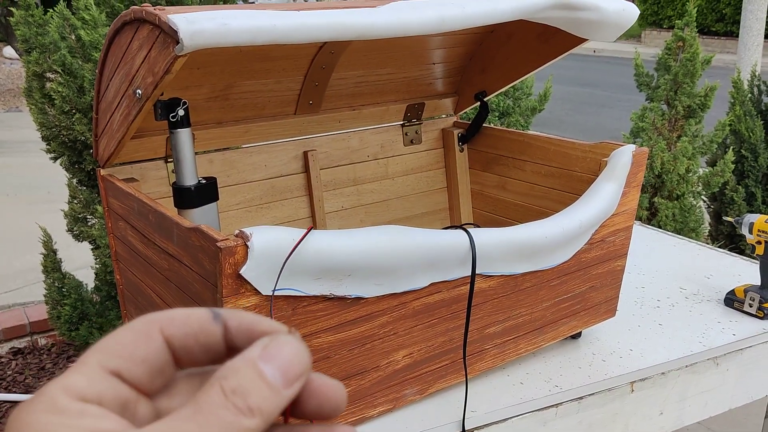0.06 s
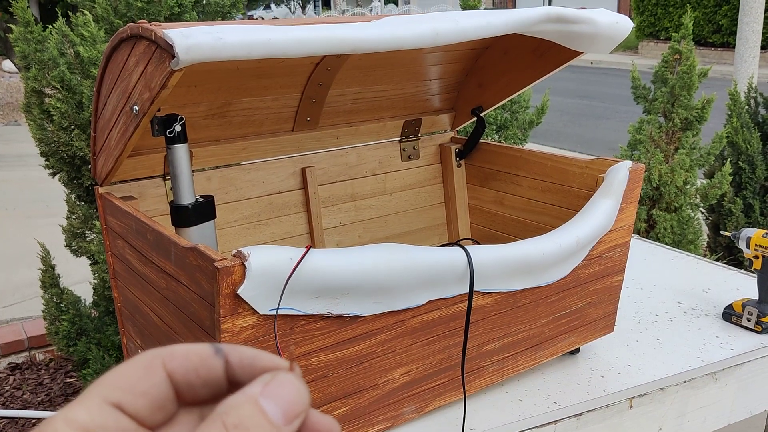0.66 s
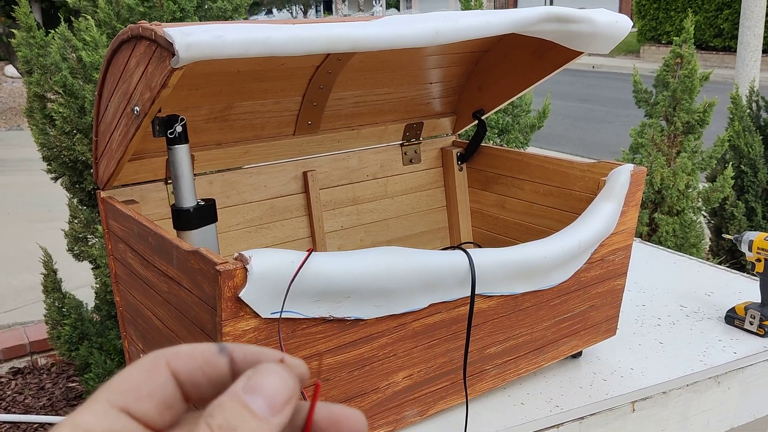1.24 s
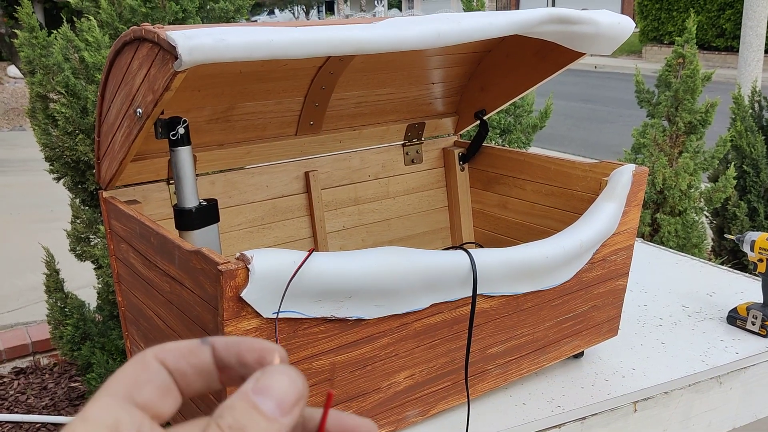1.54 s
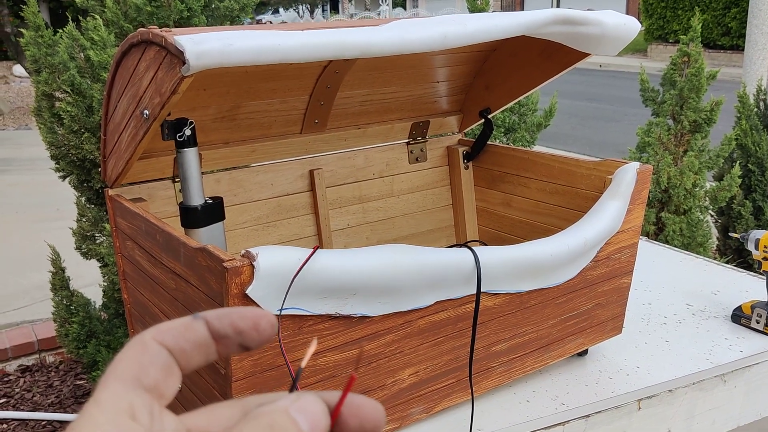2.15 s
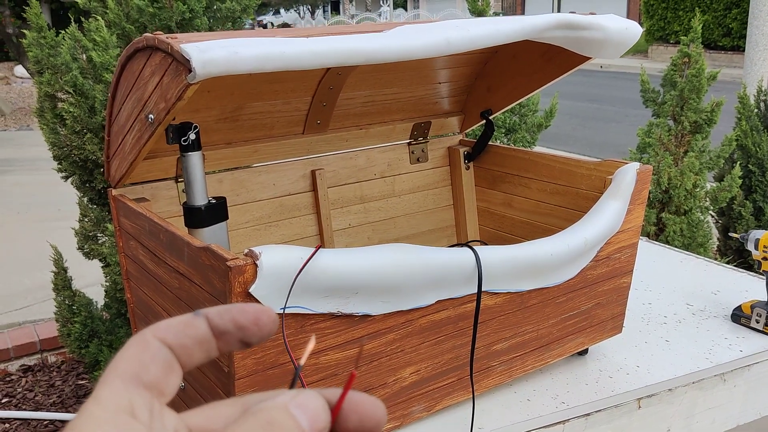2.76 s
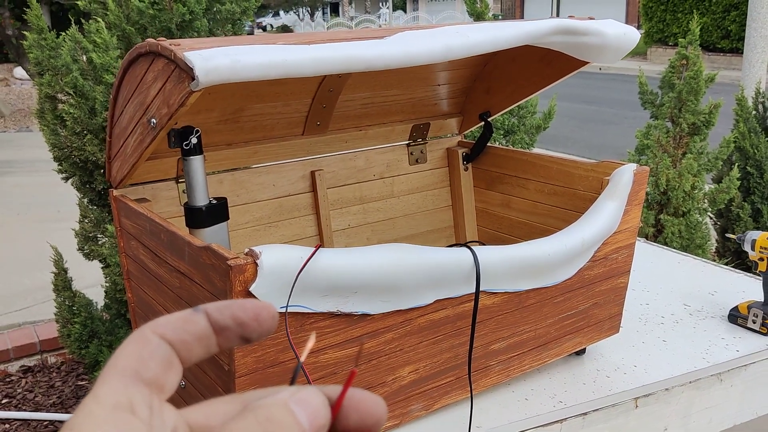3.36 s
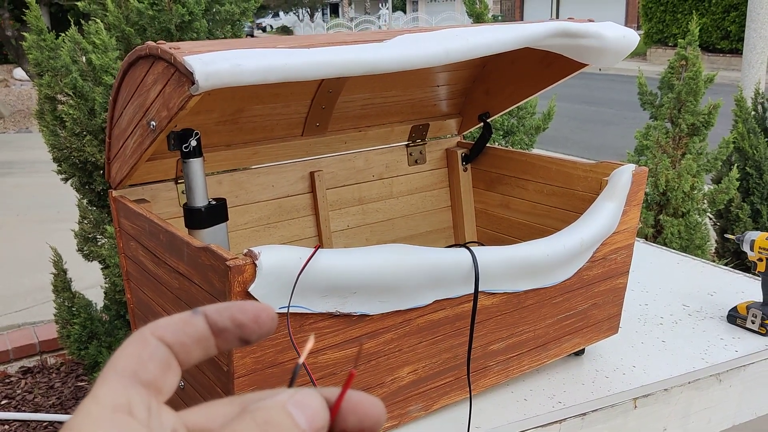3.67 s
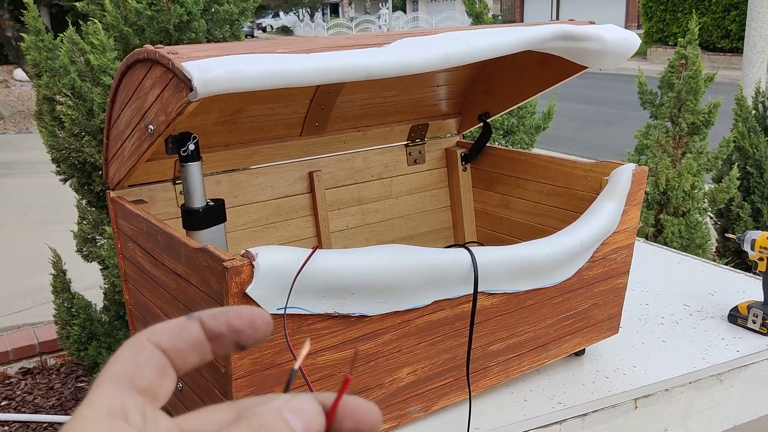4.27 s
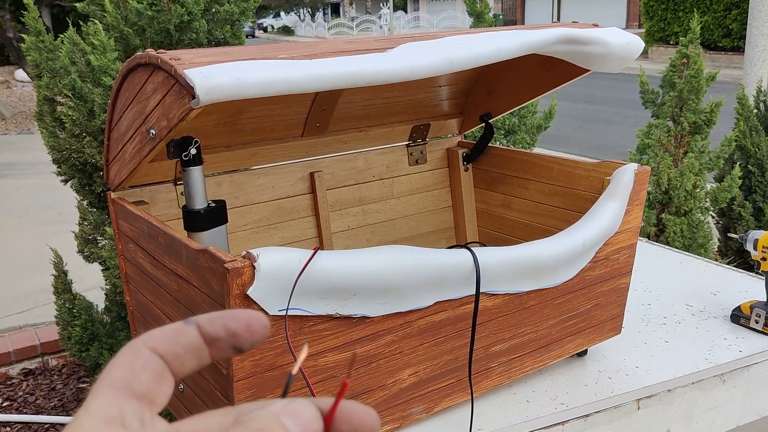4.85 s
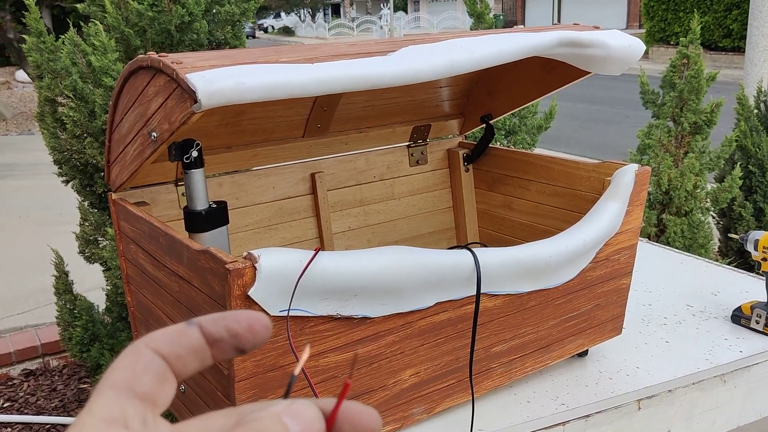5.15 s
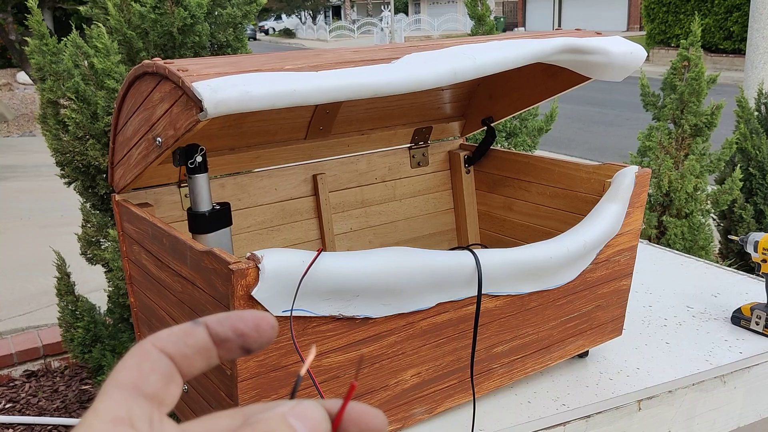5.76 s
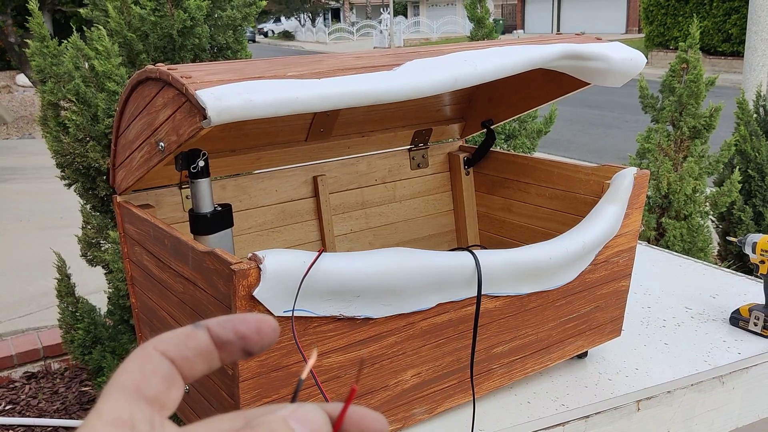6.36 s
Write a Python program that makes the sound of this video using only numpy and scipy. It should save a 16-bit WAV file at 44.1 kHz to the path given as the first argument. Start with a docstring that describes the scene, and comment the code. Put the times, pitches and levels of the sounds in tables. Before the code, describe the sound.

A small electric actuator whines over a low hum as it slowly lowers the lid of a wooden chest, outdoors and an arm's length away. Bare wires scrape briefly, and the whine dips and comes back stronger. The hinge then ticks and binds, making the lid shudder softly as the whine brightens, before the motor runs on. Light wind, distant traffic and a faint electrical buzz lie underneath.

```python
"""A small linear actuator slowly lowers the lid of a wooden chest outdoors, an arm's length away.
From the start its motor whines over a low hum, distant traffic, light wind and a faint electrical buzz.
At 1.3 s the bare supply wires scrape; the whine drops out and spins up again. From 2.3 s the loaded
hinge ticks, then binds and sets the lid shuddering while a far car passes. The whine is pushed
brighter as the load peaks at 3.4 s; then the hinge eases and the motor runs on."""
import sys
import numpy as np
from scipy import signal
from scipy.fft import rfft, irfft, next_fast_len
from scipy.io import wavfile
from scipy.ndimage import uniform_filter1d

SR = 44100
rng = np.random.default_rng(int(sys.argv[2]) if len(sys.argv) > 2 else 0)


def unload_wav(signal):
    """Save mono or channel-first audio to the path in sys.argv[1] as 16-bit WAV at rate SR, clipped to [-1, 1]."""
    wavfile.write(
        sys.argv[1],
        SR,
        np.round(np.clip(np.atleast_2d(signal).T, -1, 1) * 32767).astype(np.int16),
    )


N = 282681
T = np.arange(N) / SR
CUT_S, RESTART_S = 1.387, 1.405  # the supply breaks and returns
LOAD_PEAK_S = 3.4  # the hinge binds hardest
WOOD_PAN_DB = -1.5  # the boards sit just right of centre


def undb(db):
    """Decibels to gain."""
    return 10 ** (np.asarray(db) / 20)


def over_pitch(hz, table):
    """The columns of a frequency table, read on a log axis."""
    points, *columns = np.transpose(table)
    return [np.interp(np.log(hz + 1), np.log(points), c) for c in columns]


def pan(db):
    """Stereo gains for a level difference, left minus right."""
    return undb(np.array([[db], [-db]]) / 2)


def walk(hz):
    """A smooth random wobble, hz new values a second, with a spread near 1."""
    hold = int(SR / hz)
    steps = np.repeat(rng.standard_normal(N // hold + 1), hold)
    return 1.313 * uniform_filter1d(uniform_filter1d(steps, hold), hold)[:N]


def swell(peak_s, rise_s, fall_s):
    """A smooth rise from 0 to 1 at peak_s and back."""
    return np.exp(-((T - peak_s) / np.where(T < peak_s, rise_s, fall_s)) ** 2)


def low_pass(x, hz, order):
    """Dull a sound above hz."""
    return signal.sosfilt(signal.butter(order, hz, fs=SR, output="sos"), x)


def ring(x, modes):
    """Pass a push through resonances (frequency [Hz], width [Hz], level [dB])."""
    return sum(undb(db) * signal.lfilter(*signal.iirpeak(hz, hz / width, SR), x)
               for hz, width, db in modes)


def tilted(modes, slope_db):
    """A harder contact favours the higher modes, by slope_db an octave."""
    return [(hz, width, db + slope_db * np.log2(hz / modes[0][0])) for hz, width, db in modes]


def burst(t60, tail_db, tail_t60, rise_s=0.00056):
    """A rough contact that builds and dies fast, followed by its reflections in the open chest."""
    t = T[:SR // 4]
    fade = undb(-60 * t / t60) + undb(tail_db - 60 * t / tail_t60)
    return rng.standard_normal((2, len(t))) * fade * (1 - np.exp(-t / rise_s))


def attack_level(x, db):
    """Set the rms of the first 5 ms in each channel."""
    return x * undb(db) / np.sqrt(np.mean(x[:, :SR // 200] ** 2, axis=1, keepdims=True))


def add(out, s, x):
    """Mix a short sound in at time s."""
    i = int(s * SR)
    out[:, i:i + x.shape[1]] += x[:, :N - i]


def outdoors(calm_db=-1.57, traffic_db=-0.5, pass_db=2, wash_db=1.25, hiss_db=-0.53, flicker_db=0.6):
    """Wind rumbles in gusts, a distant car passes and tyres wash under a smooth hiss."""
    # tone of the open air: (frequency [Hz], left density [dB per Hz], right density [dB per Hz])
    air_colour = [(22, -53, -55.5), (54.4, -64.5, -56), (96, -68, -66.5), (199, -72, -71),
                  (258, -76.5, -73.5), (585, -80, -81.5), (950, -76.5, -73.5), (1202, -87.5, -83),
                  (1620, -84.5, -85), (2380, -94.5, -87.5), (4200, -99, -92.5), (6380, -95.5, -91),
                  (7180, -111, -110), (15000, -111, -111)]
    # stereo image, narrow in the bass and wide above: (frequency [Hz], left-right correlation [-1 to 1])
    image = [(25, 0.6), (60, 1), (130, 0.85), (290, 0.92), (600, 0.4), (1100, -0.26), (3000, -0.06)]
    # gusts of wind: (time [s], half length [s], rumble boost [dB])
    gusts = [(0.308, 0.51, 2.5), (1.147, 0.035, 9), (2.49, 0.53, 3), (6.355, 0.18, 9)]
    size = next_fast_len(N, True)
    hz = np.fft.rfftfreq(size, 1 / SR)
    likeness = np.clip(over_pitch(hz, image)[0], -1, 1)
    noise = rfft(rng.standard_normal((2, size))) * np.sqrt(SR) / 2
    mid, side = noise * np.sqrt([1 + likeness, 1 - likeness])
    low_cut = hz / np.hypot(hz, 11)
    air = np.array([mid + side, mid - side]) * undb(over_pitch(hz, air_colour)) * low_cut
    wind_db = calm_db + sum(db * swell(s, half_s, half_s) for s, half_s, db in gusts)
    roar_db = traffic_db + pass_db * swell(peak_s=3.24, rise_s=0.94, fall_s=0.94)
    levels = [db + flicker_db * walk(9) for db in (wind_db, roar_db, wash_db)] + [hiss_db]
    centres_hz = [49.7, 265, 1000, 5000]  # wind, car roar, tyre wash, hiss
    out = 0
    for band, db in zip(np.eye(len(centres_hz)), levels):
        share = np.interp(np.log(hz + 1), np.log(centres_hz), band)
        out = out + irfft(air * share, size)[:, :N] * undb(db)
    return out


def far_exhaust(hz=216, width_hz=55, level_db=-51):
    """The exhaust of a far vehicle, blurred to a narrow band, drones and fades."""
    band = [(hz, width_hz, 0)]
    drone = ring(ring(rng.standard_normal(N), band), band)
    fade = swell(peak_s=0.67, rise_s=0.99, fall_s=0.99)
    return drone / drone.std() * undb(level_db) * fade * pan(db=-2.5)


def electrical_buzz(rate_hz=60.022, weak_db=-85, fizz_db=-96):
    """One fizzy cycle repeats exactly: a comb of thin treble lines, much fainter at the top."""
    # strongest lines of the buzz: (harmonic [number], level [dB])
    strong_lines = [(43, -79), (56, -79), (58, -78), (62, -72), (64, -78), (66, -77), (68, -74), (72, -77),
                    (73, -73), (75, -79), (78, -79), (79, -76), (83, -79), (85, -74), (89, -74), (92, -78),
                    (94, -70), (95, -74), (96, -77), (97, -74), (98, -78), (103, -72)]
    size = 4096
    lines = np.zeros(size // 2 + 1)
    lines[50:108] = undb(weak_db) * rng.rayleigh(np.sqrt(.5), 58)
    lines[108:170] = undb(fizz_db) * rng.exponential(1, 62)
    for k, db in strong_lines:
        lines[round(k)] = undb(db)
    cycle = irfft(lines * np.exp(2j * np.pi * rng.random(len(lines)))) * size / 2
    tone = np.interp(T * rate_hz, np.arange(size) / size, cycle, period=1)
    return tone * undb([[-11], [1.5]])  # mostly on the right


def low_hum(brightness, start_hz=66.4, climb_hz_per_s=0.225, flutter=0.00524, wander_db=1, rough_db=1.56):
    """A low machine-like hum, creeping up in pitch, strongest in its second partial."""
    # partials of the low hum: (harmonic [number], level [dB], change at full brightness [dB])
    partials = [(1, -49, -1.5), (2, -42.5, -1), (3, -55, 3.5), (4, -62.5, 7.5)]
    # level of the low hum: (time [s], level [dB])
    ride = [(0, -10.5), (.4, -1.5), (.85, -10), (2.1, -4.5), (2.7, -7), (3.05, -2.5), (3.5, 1.5), (4, -7.5),
            (4.3, 2), (4.75, 4.5), (5.05, -0.7), (5.7, 0.8), (6.41, -4)]
    hz = start_hz + climb_hz_per_s * T
    phase = 2 * np.pi * np.cumsum(hz * (1 + flutter * walk(10))) / SR
    ride_db = np.interp(T, *np.transpose(ride))
    out = 0
    for k, (_, partial_db, bright_db) in enumerate(partials, 1):
        db = ride_db + partial_db + bright_db * brightness + wander_db * walk(9) + rough_db * walk(45)
        out = out + undb(db) * np.sin(k * phase + rng.uniform(0, 2 * np.pi))
    return out * pan(db=-2.5)


def lid_shudder(from_s=2.95, to_s=3.82, edge_s=0.068, slips_per_s=150, scatter_db=3, level_db=-50.5):
    """While the hinge binds, a dense run of small slips sets the boards of the lid rumbling."""
    # low modes of the boards: (frequency [Hz], width [Hz], level [dB])
    boards = [(140, 35, -1), (235, 28, -4.5), (279.5, 27, 0), (334, 25, -2), (429, 43, -8.5)]
    slips = (rng.random(N) < slips_per_s / SR) * undb(scatter_db * rng.standard_normal(N))
    rumble = sum(undb(db) * ring(ring(slips, [(hz, width, 0)]), [(hz, width, 0)])
                 for hz, width, db in boards)
    binding = (np.tanh((T - from_s) / edge_s) - np.tanh((T - to_s) / edge_s)) / 2
    return rumble / rumble.std() * undb(level_db) * binding * pan(WOOD_PAN_DB)


def hinge_ticks(knock_lag_s=0.001, metal_pan_db=-8.5):
    """Each slip of the hinge snaps in the metal, then knocks in the boards, which ring on briefly."""
    # slips of the hinge: (time [s], wood knock [dB], metal snap [dB], brightness [dB per octave])
    ticks = [(2.2765, -56, -40.5, 14), (2.281, -47, -50.5, 4), (2.3701, -51, -60, -3),
             (2.375, -45.5, -57, -2), (2.607, -47, -64, -2), (2.7781, -50, -67, 0), (2.8786, -52, -68, 3),
             (2.9491, -49, -67, -4), (2.9821, -51, -51, 5), (3.0183, -51, -65, 4), (3.067, -46.5, -64, 0),
             (3.124, -42, -53, -1), (3.151, -45, -63, 0), (3.2100, -39.5, -62, 1), (3.2772, -33, -41.5, 0),
             (3.2828, -44, -48, -4), (3.294, -44, -62, -11), (3.3268, -45.5, -61, 9), (3.368, -50, -65, -2),
             (3.4480, -43, -50.5, 0)]
    # woody body of the knock: (frequency [Hz], width [Hz], level [dB])
    wood_modes = [(270, 81, 0), (563, 140, -3), (830, 160, -1), (1120, 120, 8.5), (1480, 110, 4),
                  (1746, 150, 11), (2350, 120, 3.5), (3020, 110, -5)]
    # bright ring of the hinge metal: (frequency [Hz], width [Hz], level [dB])
    metal_modes = [(4000, 230, 1), (4450, 210, 10), (4780, 200, 13), (5440, 170, 12), (5900, 260, 2),
                   (6530, 230, 0)]
    out = np.zeros((2, N))
    for s, wood_db, metal_db, slope_db in ticks:
        knock = ring(burst(t60=0.015, tail_db=-17, tail_t60=0.2), tilted(wood_modes, slope_db))
        knock = low_pass(knock, hz=3000, order=4)
        snap = ring(burst(t60=0.0069, tail_db=-22, tail_t60=0.15), tilted(metal_modes, slope_db))
        snap = low_pass(snap, hz=6700, order=24)
        add(out, s, attack_level(snap, metal_db) * pan(metal_pan_db))
        add(out, s + knock_lag_s, attack_level(knock, wood_db) * pan(WOOD_PAN_DB))
    return out


def wire_scrape(first_t60=0.029, doubling_s=0.021, first_treble_db=-2, dulling_db_per_s=380, grit_db=0.5):
    """The wire ends catch and slip several times in a gritty scrape with a thin metallic ring."""
    # catches of the wires: (time [s], level [dB], pan left minus right [dB])
    catches = [(1.2698, -43, -5), (1.2738, -37.5, -8), (1.278, -34.5, 2), (1.2858, -41, -16.5),
               (1.2905, -44, -3), (1.298, -46, -12), (1.308, -48, -7)]
    # tone of the scrape: (frequency [Hz], level [dB])
    colour = [(300, -19), (560, -8), (760, 4), (1000, -9), (1300, -5), (2100, -7), (2750, -6), (3400, 0),
              (4200, -3), (5300, -2), (6400, -2.5), (7600, -13), (9500, -9.5), (12000, -19), (13800, -14),
              (15000, -16)]
    # ring of the wires: (frequency [Hz], width [Hz], level [dB])
    wire_modes = [(770, 70, -6), (3080, 70, -9), (3370, 60, -7), (3620, 70, -7.5), (4820, 80, -7),
                  (5170, 50, -8), (5950, 45, -5), (6900, 60, -6)]
    out = np.zeros((2, N))
    for s, db, pan_db in catches:
        # as the wires slide on, each catch lasts longer and is duller
        sliding_s = s - catches[0][0]
        slip = burst(first_t60 * 2 ** (sliding_s / doubling_s), tail_db=-23, tail_t60=.16)
        treble_db = first_treble_db - dulling_db_per_s * sliding_s
        count = slip.shape[1]
        grit = np.repeat(undb(grit_db * rng.standard_normal(count)), 20)[:count]
        hz = np.fft.rfftfreq(2 * count, 1 / SR)
        colour_db = over_pitch(hz, colour)[0] + treble_db * np.clip(hz / 7000 - 1, 0, 1)
        slip = irfft(rfft(slip * grit, 2 * count) * undb(colour_db))[:, :count]
        add(out, s, attack_level(slip + 2 * ring(slip, wire_modes), db) * pan(pan_db))
    return out


def hinge_load():
    """The load on the motor builds to 1 as the hinge binds, then eases again."""
    # moments when the hinge runs free: (time [s], half length [s], load removed [0-1])
    easings = [(5.02, 0.19, 0.25), (5.5, 0.12, 0.1)]
    relief = sum(share * swell(s, half_s, half_s) for s, half_s, share in easings)
    return swell(LOAD_PEAK_S, rise_s=1, fall_s=1.2) - relief


def motor_run(first_hz=795.7, running_hz=799.9, warming_hz_per_s=0.37, sag_hz=22.13,
              coast_s=0.033, switch_on_s=0.0098, spin_up_s=0.0304):
    """Pitch [Hz] and gain of the whine: the motor coasts at the break, restarts flat and catches up."""
    since_cut, since_restart = np.maximum(T - CUT_S, 0), np.maximum(T - RESTART_S, 0)
    flat_hz = sag_hz * np.exp(-since_restart / spin_up_s)
    hz = np.where(T < RESTART_S, first_hz, running_hz + warming_hz_per_s * since_restart - flat_hz)
    drive = np.exp(-since_cut / coast_s) + 1 - np.exp(-since_restart / switch_on_s)
    return hz, drive


def motor_whine(hz, drive, load, flutter=0.00081, wander_db=0.46, throb=0.25, rasp_rad=0.042,
                cycles_per_turn=12):
    """Load lifts the whine's overtones, which drift and waver as the moving lid shifts the reflections."""
    # partials of the whine: (harmonic [number], left and right before the break [dB], left and right
    # after it [dB], boost at full load [dB], left and right drift after the break [dB/s])
    partials = [(1, -55, -55.5, -47, -48, 0.42, -0.31, -0.52), (2, -83, -72, -62, -55, 5.2, -0.94, 0.96),
                (3, -78, -64.5, -72, -77, 3, 0, 0), (4, -67, -70, -98, -67.5, 6.7, 0, 0.7),
                (5, -69, -68, -73, -72.5, 2.2, 0, -0.22), (6, -70, -65.5, -68.5, -61, 3, 0.3, 1),
                (7, -78, -65, -88, -63.5, 2.9, 0, 1), (8, -70, -68, -73, -67, 3, 0.1, 0),
                (9, -77, -89, -95, -103, 3, 0, 0)]
    phase = 2 * np.pi * np.cumsum(hz * (1 + flutter * walk(18))) / SR
    # play in the gears jitters the timing, which smears the high partials
    phase = phase + rasp_rad * walk(260)
    # the shaft runs slightly out of true, which roughens each partial
    uneven = 1 + throb * np.sin(phase / cycles_per_turn)
    out = np.zeros((2, N))
    for k, (_, *partial_db, load_db, left_drift, right_drift) in enumerate(partials, 1):
        for ear, drift in enumerate((left_drift, right_drift)):
            before_db, after_db = partial_db[ear::2]
            base_db = np.where(T < RESTART_S, before_db, after_db + drift * (T - LOAD_PEAK_S))
            waver_db = wander_db * np.sqrt(k) * (walk(3.0) + walk(14))
            tone = np.sin(k * (phase - 0.26 * ear))  # the right ear lags slightly
            out[ear] += undb(base_db + load_db * load + waver_db) * tone
    return out * uneven * drive


def scene():
    """The actuator, its wires and the hinge in the open air."""
    hz, drive = motor_run()
    load = hinge_load()
    return (motor_whine(hz, drive, load) + low_hum(brightness=load) + electrical_buzz()
            + wire_scrape() + hinge_ticks() + lid_shudder() + far_exhaust() + outdoors())


def record(dry, top_hz=15100):
    """A steep low-pass takes off the very top of the mix."""
    return signal.sosfilt(signal.ellip(10, .1, 80, top_hz, fs=SR, output="sos"), dry)


dry = scene()
out = record(dry)
unload_wav(out)
```